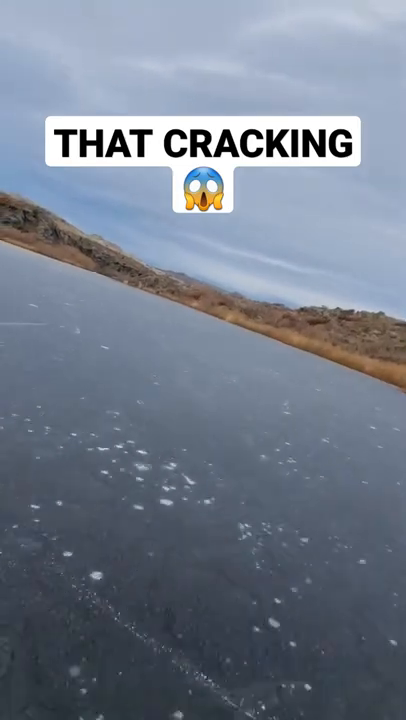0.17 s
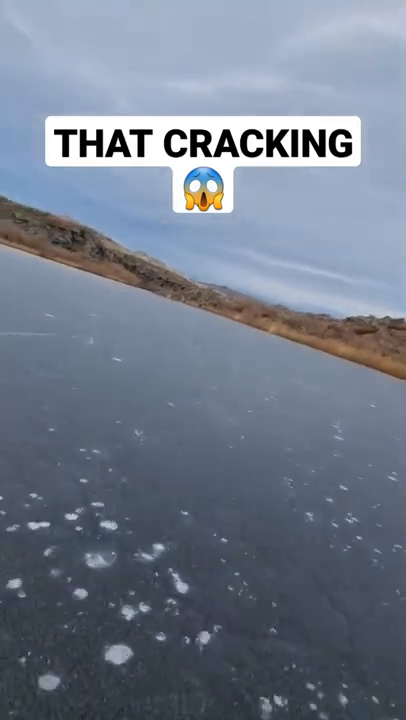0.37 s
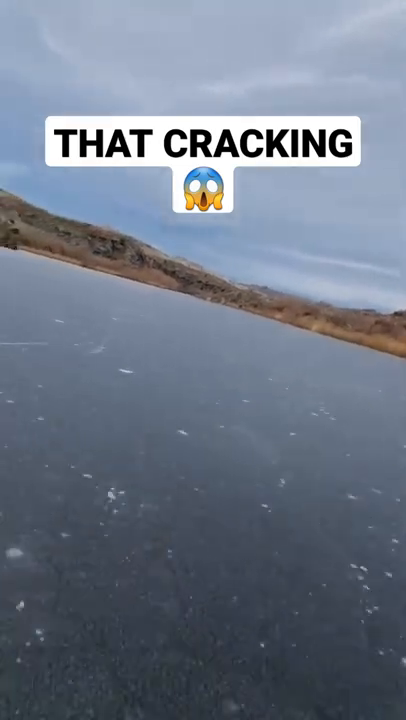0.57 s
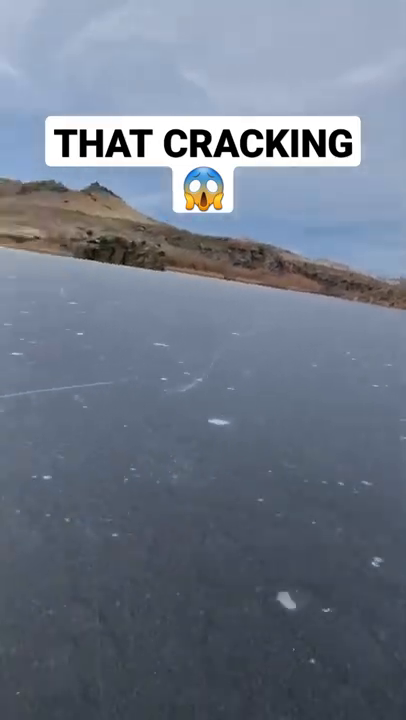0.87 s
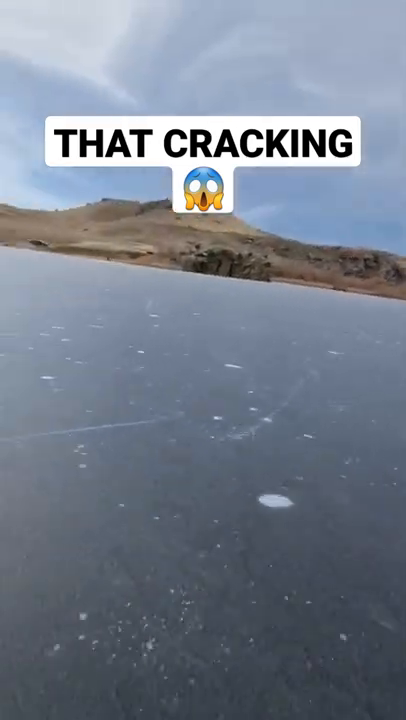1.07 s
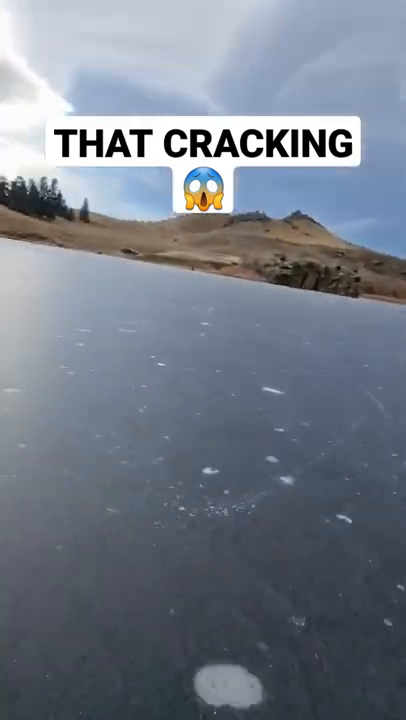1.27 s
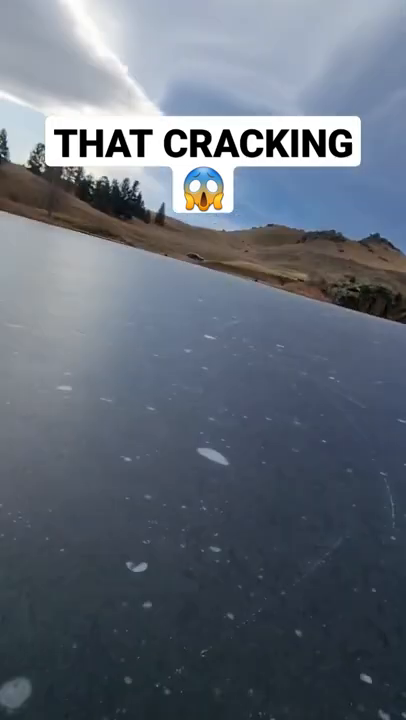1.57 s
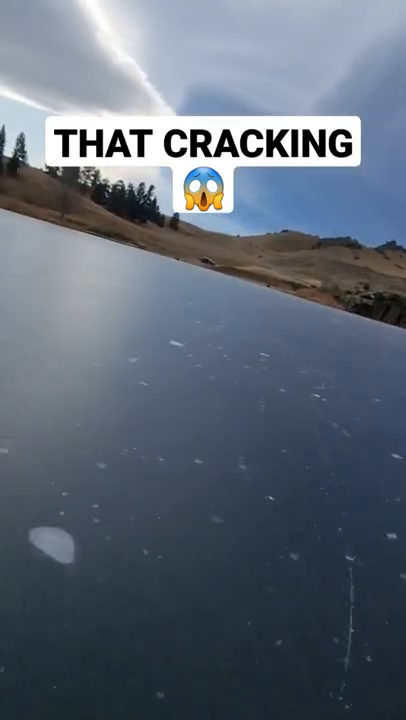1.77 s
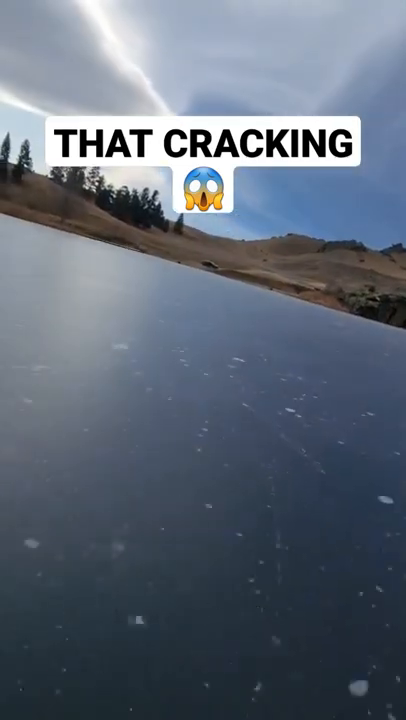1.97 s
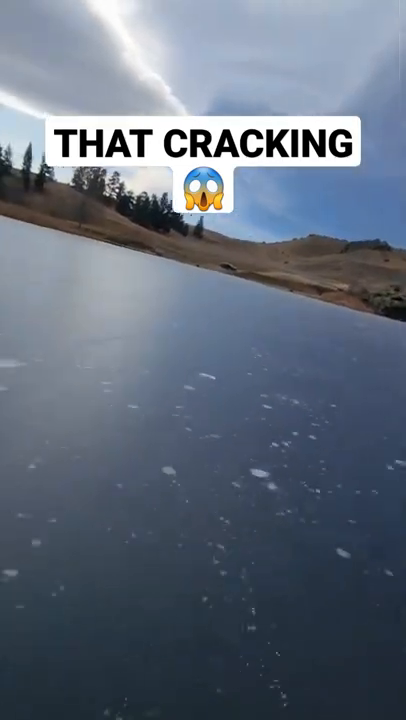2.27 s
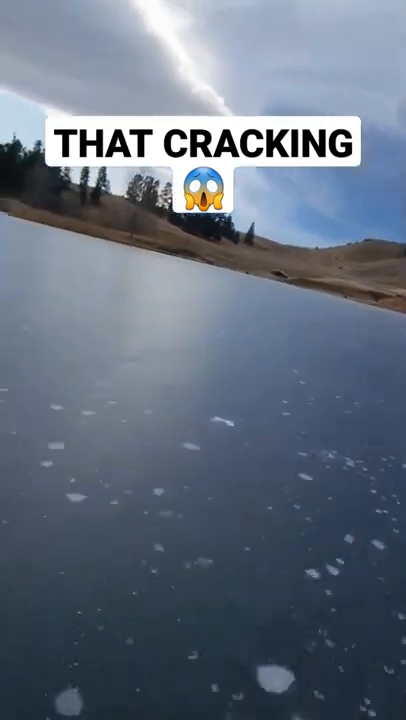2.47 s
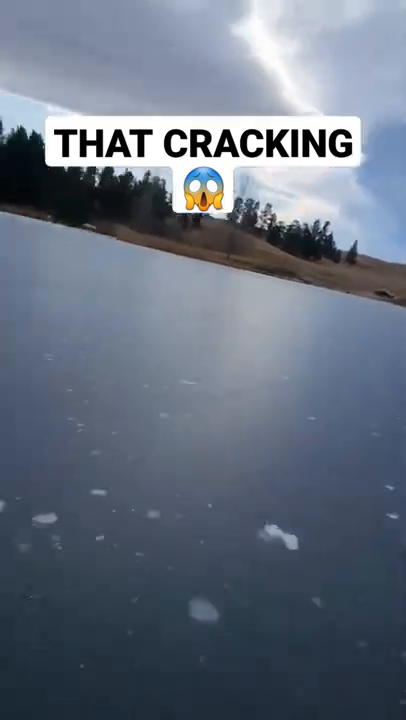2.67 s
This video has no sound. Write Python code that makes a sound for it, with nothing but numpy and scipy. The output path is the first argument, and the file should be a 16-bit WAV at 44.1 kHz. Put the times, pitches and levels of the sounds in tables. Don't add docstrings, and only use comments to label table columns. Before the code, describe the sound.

Skate blades glide over a thin frozen lake, close and outdoors, the ice drumming and ringing underneath. A sharp crack at 0.15 s starts a hissing scrape; a heavier crack hits at 0.85. Brighter ticks follow near 1.1, hollow knocks and brief groans around 1.55-1.65. Another crack at 1.9 begins a rough stride, with dense crackling ticks and snaps at 2.2-2.4, then easing scrape. Low wind buffets throughout.

```python
import sys
import numpy as np
from scipy import signal
from scipy.fft import rfft, irfft, next_fast_len
from scipy.io import wavfile

SR = 44100
rng = np.random.default_rng(int(sys.argv[2]) if len(sys.argv) > 2 else 0)


def generate_wav(sig):
    pcm = np.round(np.clip(np.atleast_2d(sig).T, -1, 1) * 32767).astype(np.int16)
    wavfile.write(sys.argv[1], SR, pcm)


def ratio(d):
    e = np.asarray(d, float) / 20
    return 10 ** e


N = 123921

# (frequency [Hz], density [dB per Hz])
ICE_HISS = [(1500, 1.5), (2500, -3.5), (4000, -3), (5200, -4), (7300, 1), (8300, -7), (13500, -6),
            (15500, -2)]
CRACK_TIMES = [
    .1481,
    .8508,
    1.8915,
    2.1757,
]
# (body [dB], edge [dB], air [dB], forerunner [dB])
CRACK_LEVELS = [
    (5.5, -14, 6, -0.5),
    (6, 4, 11, -12),
    (-2, -6, 8, -2.5),
    (-20, 0.5, -1, -18),
]
# (low [Hz], high [Hz])
CRACK_BANDS = [
    (250, 3800),
    (1090, 4200),
    (4460, 8200),
    (8100, 13400),
    (3480, 8100),
]


def rms_one(x):
    return x / np.sqrt(np.mean(x ** 2) + 1e-20)


def in_time(rows):
    s, *columns = np.transpose(rows)
    return [np.interp(np.arange(N) / SR, s, c) for c in columns]


def at_hz(points, hz):
    point_hz, value = np.transpose(points)
    return np.interp(np.log(hz + 1), np.log(point_hz), value)


def colour(x, spectrum):
    gain = ratio(at_hz(spectrum, np.linspace(0, SR / 2, 4097)))
    cepstrum = irfft(np.log(gain / np.sqrt(np.mean(gain ** 2))))
    cepstrum[1:4096] *= 2
    cepstrum[4097:] = 0
    impulse = irfft(np.exp(rfft(cepstrum)))[None, :4096]
    return signal.fftconvolve(x, impulse)[:, :N]


def band(x, low_hz, high_hz):
    return signal.sosfilt(signal.butter(2, [low_hz, high_hz], "band", fs=SR, output="sos"), x)


def drift(rate_hz):
    r = np.exp(-80 * np.pi * rate_hz / SR)
    slow = signal.lfilter([1], [1, -2 * r, r * r], rng.standard_normal(N // 40 + 2002))[2000:]
    return np.interp(np.arange(N) / 40, np.arange(len(slow)), rms_one(slow))


def decay(s, db, tau, rise=1e-5):
    t = np.arange(N) / SR - np.asarray(s)[:, None]
    return ratio(np.asarray(db))[:, None] * np.exp(np.where(t < 0, t / rise, -t / tau))


def gate(s, span, edge):
    t = np.arange(N) / SR
    return np.clip(np.minimum(t - s, s + span - t) / edge, 0, 1)


def noise():
    return rng.standard_normal((2, N))


def random_signs():
    return rng.choice([-1., 1.], (2, N))


def chatter():
    bites_per_s, bite_s, spread_db, jitter = 170, .0008, 2.8, .45
    draw = rng.standard_normal((1500, 2))
    gaps_s = np.exp(jitter * draw[:, 0]) / bites_per_s
    at = (np.cumsum(gaps_s) * SR).astype(int)
    bites = np.zeros(N)
    bites[at[at < N]] = ratio(spread_db * draw[at < N, 1])
    r = np.exp(-2 / (bite_s * SR))
    return rms_one(signal.lfilter([1], [1, -2 * r, r * r], bites))


def blade(bites):
    # (time [s], hiss level [dB], extra brightness [dB], chatter depth [0-1])
    pressure = [(0, -44.5, -5, 0), (.14, -46, -2, 0.2), (.17, -31.5, -1, 0.73), (.24, -37, -2.5, 0.34),
                (.38, -41.5, -9.5, 0.2), (.41, -50.5, 1, 0.54), (.52, -48, -8, 0), (.56, -38.5, -9.5, 0),
                (.83, -43.5, -7, 0.3), (.92, -36, -4, 0.08), (1.19, -32.5, -4.5, 0.16),
                (1.22, -42, -5, 0.1), (1.88, -46.5, -6, 0), (1.93, -32, -0.5, 0.46),
                (2.14, -36.5, -3, 0.23), (2.37, -26, -2.5, 0.28), (2.4, -39, 0.5, 0),
                (2.81, -36.5, -5.5, 0.23)]
    # (time [s], length [s], hiss level [dB])
    dig_events = [
        (0.783, 0.043, -47.5),
        (1.514, 0.061, -35.5),
        (1.62, 0.146, -48),
        (2.47, 0.017, -32.5),
        (2.595, 0.2, -45),
    ]
    db, bright_db, depth = in_time(pressure)
    depth = np.clip(depth + .15, .25, .8)
    digs = sum(ratio(d) * gate(s, span, 0.012) for s, span, d in dig_events)
    pulse = np.sqrt(1 - depth ** 2) + depth * bites
    x = colour(noise() * pulse * (ratio(db + 1.7 * drift(55)) + digs), ICE_HISS)
    brighter_db = bright_db + 0.07 * (db + 29.5)
    edges_hz = [900, 1800, 2600, 3600, 4800, 6200, 8300, 11000, 14000, 18000]
    out = np.zeros((2, N))
    for i, (low, high) in enumerate(zip(edges_hz, edges_hz[1:])):
        patch_db = 1 + .9 * drift(25) + brighter_db * (low > 8000)
        out += (-1) ** i * band(x, low, high) * ratio(patch_db)
    return out


def sheet(bites):
    # (time [s], drumming level [dB], ringing level [dB])
    load = [(0, -39, -40.5), (.28, -39, -42.5), (.36, -41.5, -46.5), (.5, -39, -40.5), (.55, -33, -34),
            (.66, -37.5, -41), (.82, -36, -40), (1.0, -33.5, -34), (1.17, -31.5, -27.5), (1.23, -38, -43),
            (1.42, -39.5, -41.5), (1.55, -27.5, -32), (1.6, -33, -35.5), (1.68, -36.5, -35.5),
            (1.85, -37.5, -34.5), (2.32, -32.5, -37.5), (2.42, -37, -37), (2.81, -36, -33.5)]
    # (frequency [Hz], density [dB per Hz])
    drum_spectrum = [(120, -8.5), (250, -3), (420, 1), (700, -0.5), (1000, -9.5), (1600, -40), (2200, -30),
                     (3000, -40.5)]
    # (frequency [Hz], density [dB per Hz])
    ring_spectrum = [(500, -24.5), (800, 3), (1100, 6), (1350, 3), (1700, -5.5), (2100, -15), (3000, -34)]
    drum_db, ring_db = in_time(load)
    drum = noise() * (0.94 + 0.29 * bites) * ratio(drum_db + 7.5 + 0.73 * drift(12.0))
    drum = colour(drum, drum_spectrum)
    ring = noise() * (0.88 + .5 * bites) * ratio(ring_db + 3.5 + 1.7 * drift(13.2))
    return drum + colour(ring, ring_spectrum)


def wind():
    # (time [s], level [dB])
    gusts = [(0, -41.5), (.06, -38.5), (.4, -37.5), (1.1, -37.5), (1.5, -38), (2.2, -32.5), (2.5, -40.5),
             (2.81, -35.5)]
    # (time [s], level [dB], half length [s])
    buffets = [(.29, -28.5, 0.022), (0.736, -38, 0.017), (0.825, -35.5, 0.017), (0.902, -42, 0.01),
               (1.047, -42, 0.057), (1.184, -38, 0.012), (1.503, -39, 0.019), (1.708, -34, 0.053),
               (1.817, -40, 0.028), (1.951, -33.5, .03), (2.085, -28, 0.018), (2.262, -29, 0.022),
               (2.344, -38, .02), (2.458, -35.5, 0.051), (2.595, -36, .03), (2.72, -29, 0.015)]
    # (frequency [Hz], density [dB per Hz])
    wind_spectrum = [(20, -15), (40, 2.5), (70, 8.5), (110, 3), (170, -1.5), (260, -6.5), (400, -46.5)]
    db, = in_time(gusts)
    t = np.arange(N) / SR
    level = ratio(db) + sum(ratio(d) * np.exp(-((t - s) / half) ** 2) for s, d, half in buffets)
    lumps_db = 4.0 + 1.03 * np.array([drift(6.7), drift(11.5)])
    return colour(noise() * level * ratio(lumps_db), wind_spectrum)


def clicks(db, lag_s=0):
    out = np.zeros(N)
    out[((np.array(CRACK_TIMES) + lag_s) * SR).astype(int)] = ratio(db)
    return out


def cracks():
    s = np.array(CRACK_TIMES)
    _, edge_db, air_db, fore_db = np.transpose(CRACK_LEVELS)
    _, _, edge_band, air_band, fore_band = CRACK_BANDS
    shards = random_signs()
    air = band(band(clicks(air_db - 2.5), *air_band), *air_band)
    edge = band(shards * decay(s, edge_db + 2, .0006, rise=.00005).sum(0), *edge_band)
    swell = decay(s - 0.0012, fore_db - 3.5, 0.00022, rise=0.0029).sum(0)
    forerunner = band(shards[::-1] * swell, *fore_band)
    tail = decay(s, air_db - 11 - 18.5, 0.036).sum(0)
    return air + edge + forerunner + colour(shards[::-1] * tail, ICE_HISS)


def crack_bodies():
    body_db = np.transpose(CRACK_LEVELS)[0] + 6
    far_lag_s, far_db = 0.00054, 11.5
    near = band(clicks(body_db), *CRACK_BANDS[0])
    far = band(clicks(body_db + far_db, far_lag_s), *CRACK_BANDS[1])
    return np.array([far, near])


def snaps():
    # (time [s], peak [dB])
    snap_events = [(0.2215, -17), (0.2922, -37), (0.536, -26), (0.715, -27), (0.801, -32), (0.8644, -34),
                   (0.87, -38), (0.9926, -46), (1.1653, -35), (1.2795, -34), (1.365, -33), (1.3962, -45),
                   (1.448, -37), (1.551, -21), (1.6398, -25), (1.6854, -42), (.843, -27), (2.1752, -15.5),
                   (0.202, -24), (0.211, -23), (2.298, -9)]
    s, db = np.transpose(snap_events)
    snap_s = .0009
    return colour(random_signs() * decay(s, db + 3.0, snap_s, rise=snap_s / 4).sum(0), ICE_HISS)


def ticks():
    # (time [s], peak [dB])
    tick_events = [(0.32, -27), (0.3768, -44), (0.477, -44), (0.4894, -34), (0.5476, -43), (0.5836, -45),
                   (1.038, -29), (1.081, -20), (1.092, -20), (1.1447, -23), (1.1834, -28), (1.1926, -28),
                   (1.2052, -35), (1.4273, -37), (1.5051, -40), (1.5333, -34), (1.6281, -40), (1.7306, -33),
                   (1.748, -31), (1.9344, -37), (1.9566, -18), (2.016, -20), (2.0323, -23), (2.0498, -16),
                   (2.1024, -34), (2.1251, -32), (2.1407, -23), (2.155, -21), (2.2109, -28), (2.2173, -21),
                   (2.2273, -15), (2.232, -18), (2.2387, -14), (2.2465, -18), (2.2512, -25), (2.2573, -27),
                   (2.27, -21), (2.2781, -25), (2.2845, -22), (2.2883, -27), (2.3018, -17), (2.309, -26),
                   (2.3149, -32), (2.3253, -16), (2.3283, -17), (2.3357, -20), (2.3432, -24), (2.3489, -25),
                   (2.3534, -22), (2.3587, -28), (2.368, -18), (2.371, -20), (2.3787, -21), (2.4103, -25),
                   (2.4216, -16), (2.472, -25), (2.6831, -27)]
    s, db = np.transpose(tick_events)
    tick_s = 0.00065
    x = random_signs() * decay(s, db + 7.5, tick_s, rise=tick_s / 4).sum(0)
    return band(x, 4840, 8000) + ratio(-7) * colour(x, ICE_HISS)


def knocks():
    # (time [s], peak [dB], pitch [Hz], left-right [dB])
    knock_events = [(0.394, -36, 310, -26), (0.512, -28, 550, -3.5), (0.534, -20, 474, -8),
                    (0.667, -27, 307, -14), (1.121, -20, 570, -12), (1.43, -24, 310, -11),
                    (1.551, -18, 380, -3), (1.64, -10.5, 910, 2), (1.668, -20, 910, 1),
                    (2.244, -19, 372, -9), (2.329, -19.5, 380, -5)]
    t, out = np.arange(N) / SR, np.zeros((2, N))
    cycles = 5
    for s, db, hz, pan_db in knock_events:
        pan = ratio(np.array([[pan_db], [-pan_db]]) / 2)
        envelope = decay([s + 0.0012], [db], cycles / hz / 3, rise=0.0007)
        out += pan * envelope * np.sin(2 * np.pi * hz * (t - s))
    return out


def rasps(bites):
    # (time [s], length [s], level [dB], resonance [Hz])
    rasp_events = [
        (0.592, 0.053, -44.5, 420),
        (1.287, 0.051, -40, 870),
        (1.527, 0.033, -33, 820),
        (1.623, 0.12, -38, 910),
        (1.993, 0.022, -53, 780),
        (2.512, 0.09, -47, 606),
    ]
    out = np.zeros((2, N))
    for s, span, db, hz in rasp_events:
        rasp = rms_one(band(noise(), hz * 0.75, hz * 1.08)) * (1.68 + 0.93 * bites)
        sides = .5 * rasp[1] * np.array([[1], [-1]])
        out += ratio(db) * gate(s, span, 0.013) * (rasp[0] + sides)
    return out


def ports(pair):
    # (frequency [Hz], level [dB])
    shade = [(60, -4), (200, -8), (500, -6), (1100, -2), (2400, 0), (3300, -1.5), (4300, -9), (15000, -9)]
    # (frequency [Hz], likeness [0-1])
    likeness = [(100, 0.03), (260, 0.47), (700, 0.82), (1300, 0.87), (1900, 0.63), (2350, 0.067),
                (3000, 0.48), (4500, 0.16), (15000, 0.15)]
    # (start [s], frequency where the ports cancel [Hz], treble lag [s])
    bearings = [
        (0, 2880, 0.0006),
        (.52, 2600, 0.00047),
        (1.22, 3190, 0.00056),
        (1.88, 3600, 0.0004),
    ]
    lag_low_s, turn_hz, treble_hz = 0.00036, 1310, 2330
    size = next_fast_len(N + 4096)
    hz = np.arange(size // 2 + 1) * SR / size
    shared, own = rfft(pair, size) * ratio(at_hz(shade, hz))
    alike = np.clip(at_hz(likeness, hz), 0, 1)
    far = irfft(np.sqrt(1 - alike ** 2) * own, size)[:N]
    ends = [s for s, _, _ in bearings[1:]] + [N / SR + 1]
    for (s, cancel_hz, lag_s), end in zip(bearings, ends):
        low_turns = lag_low_s * np.maximum(hz - turn_hz, 0)
        turns = np.where(hz < treble_hz, low_turns, lag_s * (hz - cancel_hz))
        lagged = irfft(alike * shared * np.exp(-2j * np.pi * turns), size)[:N]
        far -= gate(s - .01, end - s + .01, .01) * lagged
    return np.array([far, pair[0]])


def hollow(x):
    # (time [s], length [s], centre [Hz], width [Hz])
    dropouts = [(.008, .02, 2700, 250), (.18, .035, 3300, 300), (.215, .045, 3320, 150),
                (.25, .03, 2900, 350), (.28, .05, 3050, 120), (.325, .035, 3150, 250),
                (.35, .045, 2950, 350), (.395, .05, 3000, 150), (.463, .024, 1080, 120),
                (.872, .055, 2830, 380), (.927, .05, 2730, 170), (1.02, .03, 3150, 200),
                (1.02, .055, 2480, 150), (1.33, .035, 2980, 130), (1.93, .09, 3600, 130),
                (2.23, .025, 1120, 100), (2.275, .045, 3600, 200), (2.35, .17, 3550, 100),
                (2.47, .07, 2350, 100), (2.525, .03, 3500, 200), (2.63, .07, 2450, 110)]
    hz = np.arange(N // 2 + 1) * SR / N
    shared = rfft(x.mean(0))
    lost = np.zeros(N)
    for s, span, at, width in dropouts:
        notch = np.clip(3 - 3.2 * abs(hz - at) / width, 0, 1)
        lost += gate(s - .016, span + .032, .006) * irfft(shared * notch, N)
    return x - lost


def scene():
    bites = chatter()
    underfoot = blade(bites) + sheet(bites) + cracks() + snaps() + ticks() + wind()
    return ports(underfoot) + knocks() + rasps(bites) + crack_bodies()


def roll_off(x):
    return signal.sosfilt(signal.butter(12, 16520, fs=SR, output="sos"), x)


def record(dry):
    limit, mic_top_hz = .74, 15450
    limited = limit * np.tanh(dry / limit)
    top_cut = signal.cheby2(10, 50, mic_top_hz + 500, fs=SR, output="sos")
    mix = hollow(signal.sosfilt(top_cut, limited))
    return roll_off(mix)


dry = scene()
out = record(dry)
generate_wav(out)
```